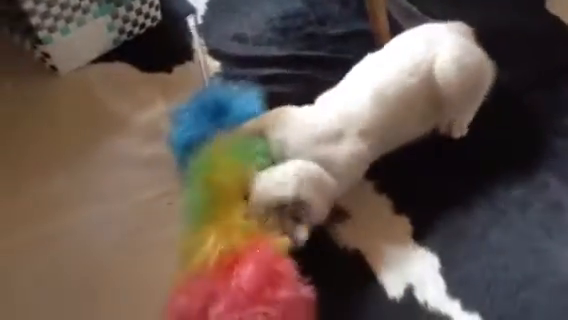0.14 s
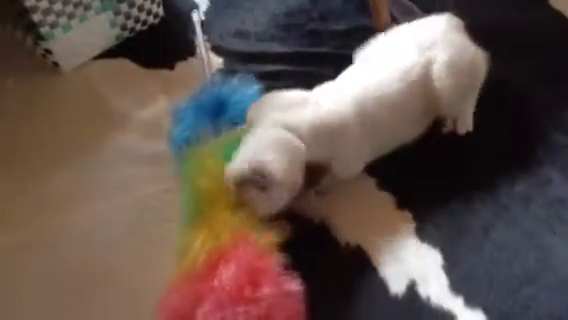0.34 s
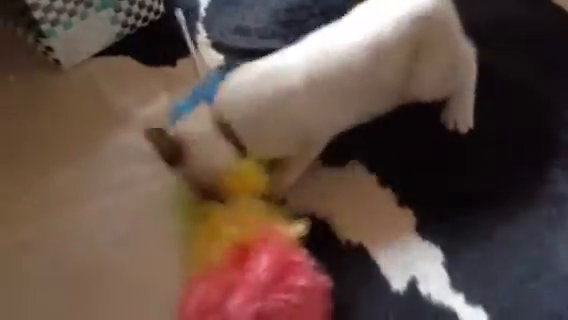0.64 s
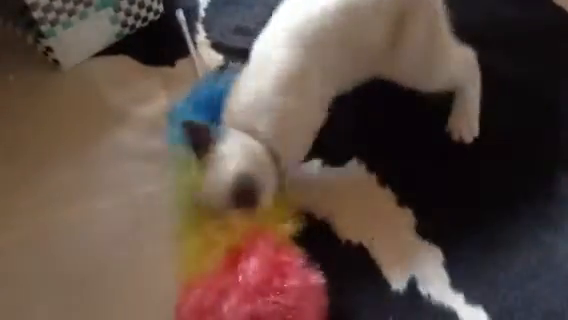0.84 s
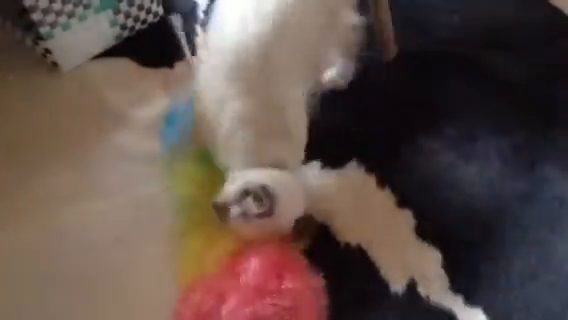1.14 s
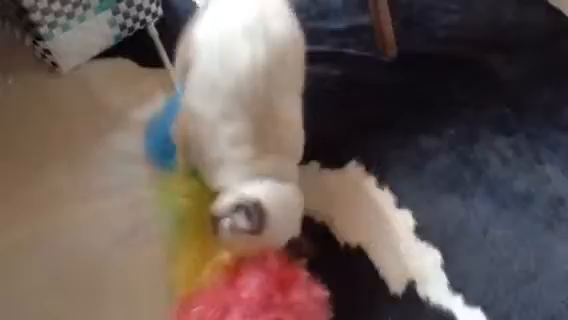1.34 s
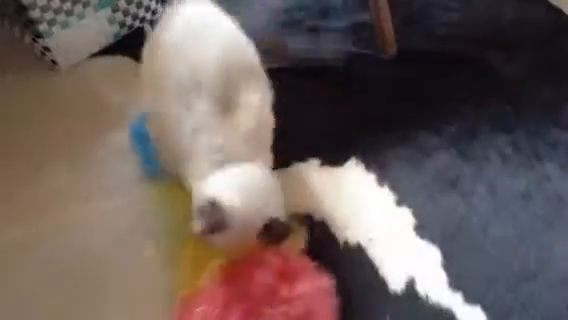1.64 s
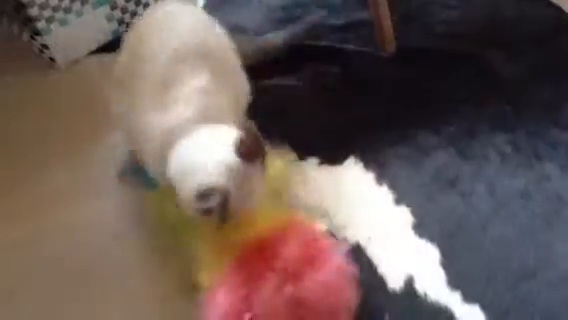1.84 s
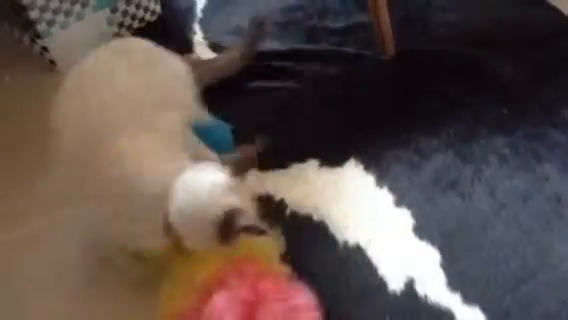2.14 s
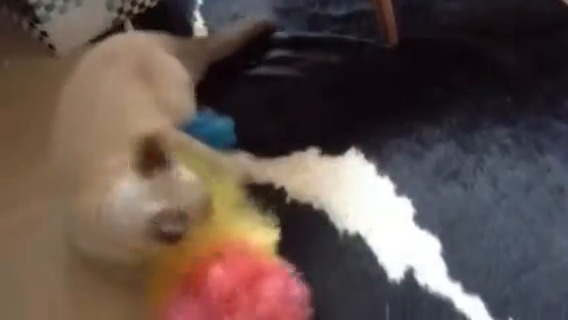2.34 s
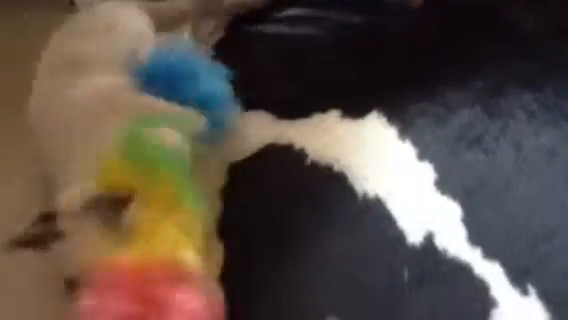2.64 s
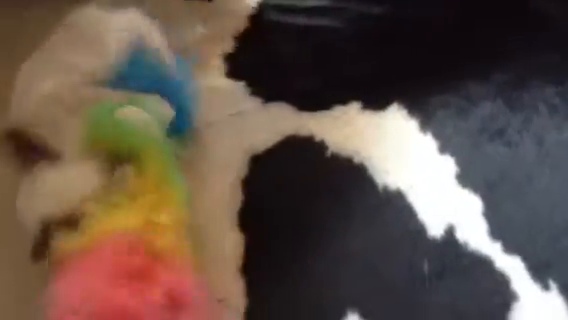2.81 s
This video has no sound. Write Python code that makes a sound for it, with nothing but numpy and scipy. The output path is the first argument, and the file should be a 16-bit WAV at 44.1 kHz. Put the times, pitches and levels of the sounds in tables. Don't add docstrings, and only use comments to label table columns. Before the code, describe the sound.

Cat wrestling a fluffy duster: soft crackly rustling, faint paw thumps, claw squeaks, one hard knock near the end

```python
import sys
import numpy as np
from scipy import signal
from scipy.fft import rfft, irfft
from scipy.io import wavfile
from scipy.ndimage import uniform_filter1d

SR = 44100
rng = np.random.default_rng(int(sys.argv[2]) if len(sys.argv) > 2 else 0)


def transcribe(u):
    v = np.clip(np.atleast_2d(u).T, -1, 1)
    q = np.round(v * 32767).astype(np.int16)
    wavfile.write(sys.argv[1], SR, q)


def magnitude_from_level(level_db):
    exponent = np.asarray(level_db, float) / 20
    return 10 ** exponent


N = 130977


def evened(x):
    return x / np.sqrt(np.mean(x ** 2) + 1e-20)


def read(points, hz):
    f, value = np.transpose(points)
    return np.interp(np.log(hz + 1), np.log(f + 1), value)


def over_time(points):
    return np.interp(np.arange(N) / SR, *np.transpose(points))


def played(events, sound):
    track = np.zeros(N)
    for start, *row in events:
        event = sound(*row)
        part = track[round(start * SR):][:len(event)]
        part += event[:len(part)]
    return track


def resonate(x, hz, width_hz):
    turn = np.exp(2j * np.pi * hz * np.arange(len(x)) / SR)
    r = np.exp(-np.pi * width_hz / SR)
    return 2 * (turn * signal.lfilter([1 - r], [1, -r], x / turn + 1e-18)).real


def resonate_twice(x, hz, width_hz):
    return evened(resonate(resonate(x, hz, width_hz), hz, width_hz))


def coloured(x, points, patchy_db):
    hz, t, z = signal.stft(x, SR, nperseg=512, noverlap=384)
    patches = uniform_filter1d(rng.standard_normal(z.T.shape), size=16, axis=0)
    patches = evened(uniform_filter1d(patches, size=12, axis=1))
    z = z * magnitude_from_level(read(points, hz)[:, None] + patchy_db * patches.T)
    return evened(signal.istft(z, SR, nperseg=512, noverlap=384)[1][:N])


# frequency in Hz, level in dB per Hz.
AIR = [(40, -13.5), (100, -9), (190, -0.5), (600, -5), (950, -11.5), (2000, -13), (6000, -15.5),
       (15000, -18)]


def hiss():
    return magnitude_from_level(-66) * coloured(rng.standard_normal(N), AIR, patchy_db=0.87)


# multiple of the turning rate, level in dB.
HUM = [(2, -85.5), (3, -90), (5.3, -84), (8, -86.5), (10, -85), (17, -85.5)]
# time in seconds, level in dB.
DRONE = [(0, -69), (.5, -72.5), (.64, -81), (1.2, -74), (1.7, -74.5), (2.2, -78), (2.97, -78.5)]


def motor():
    turning_hz, width_hz = 37.1, 2.0
    t = np.arange(N) / SR
    sixth = np.sqrt(2) * np.sin(2 * np.pi * 6 * turning_hz * t)
    upper = np.sin(2 * np.pi * 16 * turning_hz * t)
    upper_swell = np.clip((t - .1) / .2, 0, 1) * (t < .55)
    blur = evened(resonate(rng.standard_normal(N), 222, 12.))
    drone = (sixth + 0.4 * upper * upper_swell + 0.22 * blur) * magnitude_from_level(over_time(DRONE))
    partials = np.zeros(N)
    for multiple, db in HUM:
        partials += magnitude_from_level(db) * resonate_twice(rng.standard_normal(N), multiple * turning_hz, width_hz)
    return drone + partials


# start in seconds, level in dB, centre in Hz, width in Hz.
SPLITS = [(1.367, -72, 7570, 1400), (1.436, -72, 5150, 1050), (1.575, -76, 5150, 1050),
          (1.575, -80, 11700, 1400), (2.226, -76, 6890, 1400), (2.365, -75, 13100, 1400)]


def split(db, hz, width_hz):
    length_s = .046
    t = np.arange(0, length_s, 1 / SR)
    in_band = abs(np.fft.rfftfreq(len(t), 1 / SR) - hz) < width_hz / 2
    band = irfft(rfft(rng.standard_normal(len(t))) * in_band, len(t))
    return magnitude_from_level(db - 2.5) * np.sin(np.pi * t / length_s) * evened(band)


# time in seconds, level in dB.
RUB = [(0, -63.5), (.12, -62.5), (.25, -69), (.4, -64.5), (.6, -63.5), (.82, -63), (1.02, -69.5),
       (1.3, -57.5), (1.44, -60), (1.62, -65), (1.9, -62), (2.06, -62.5), (2.15, -70), (2.37, -59.5),
       (2.48, -61.5), (2.57, -59), (2.68, -62), (2.97, -64)]
# frequency in Hz, level in dB per Hz.
FIBRES = [(150, -18.5), (500, -5), (1000, -7), (2000, -1.5), (4000, -1), (6500, -2.5), (10000, -5),
          (15000, -6)]


def rustle():
    crackles_per_s, spread_db, smooth_share = 2500, 2.5, 0.57
    size = magnitude_from_level(spread_db * np.minimum(rng.exponential(1, N), 4)) * rng.choice([-1, 1], N)
    crackles = evened(size * (rng.random(N) < crackles_per_s / SR))
    mix = smooth_share * rng.standard_normal(N) + (1 - smooth_share) * crackles
    return magnitude_from_level(over_time(RUB) - 1.5) * coloured(mix, FIBRES, patchy_db=1.0)


def stroke(length, db, hz, q):
    t = np.arange(0, .35, 1 / SR)
    slips = rng.standard_normal(len(t)) * (1 + (rng.random(len(t)) < 900 / SR) * 2.5)
    swell = abs(np.sin(np.pi * np.minimum(t / length, 1))) ** 0.43
    return magnitude_from_level(db) * swell * resonate_twice(slips, hz, hz / q)


# start in seconds, length in seconds, level in dB, centre in Hz.
SWISHES = [(.0, .03, -72, 14000), (.32, .085, -72, 13500), (.52, .13, -71, 13500),
           (.654, .035, -65.5, 14000), (.66, .026, -63, 4900), (.66, .028, -66.5, 2900),
           (.77, .06, -72, 13500), (1.11, .1, -74, 13500), (1.1, .12, -75, 5400), (1.24, .1, -68, 5400),
           (1.38, .06, -68, 5500), (1.39, .09, -69, 14000), (1.5, .06, -72, 13000), (2.02, .07, -70, 13500),
           (2.31, .09, -72, 13000), (2.52, .08, -72, 12800), (2.53, .06, -69, 5500),
           (2.715, .075, -68, 12800), (2.8, .04, -63.5, 12800), (2.8, .038, -61.5, 4700)]


def swish(length, db, hz):
    return stroke(length, db, hz, q=3.)


# start in seconds, length in seconds, level in dB, centre in Hz.
SCUFFS = [(0.539, .09, -69, 5530), (.765, 0.077, -63.5, 540), (0.777, 0.2, -68.5, 3400),
          (.800, 0.28, -71, 1574), (1.271, 0.066, -70, 1650), (1.280, 0.1, -72, 3500),
          (1.630, .14, -72, 480), (1.735, .13, -68.5, 5600), (1.820, .16, -74.5, 580),
          (2.043, .045, -67.5, 3300), (2.69, .1, -69, 2600), (2.520, 0.19, -67, 2400),
          (2.530, 0.11, -67, 520), (2.535, .15, -66.5, 4000), (2.710, 0.083, -66, 4970)]


def scuff(length, db, hz):
    return stroke(length, db, hz, q=1.47)


# start in seconds, length in seconds, level in dB, pitch in Hz, glide in Hz.
SQUEAKS = [(1.738, 0.013, -57.5, 5250, 197), (1.743, 0.013, -58.5, 5800, 102.5),
           (1.752, 0.023, -56, 5750, 302), (1.7876, 0.012, -48, 5510, -150),
           (1.796, 0.014, -48.5, 5750, -38), (1.802, .018, -49, 5280, -250), (1.822, 0.0074, -57, 5700, 94),
           (1.831, .016, -60, 5050, 303), (1.834, 0.021, -58.5, 5900, 146), (1.876, 0.011, -58, 5100, 196),
           (1.88, .012, -66, 5800, 197), (1.902, .012, -63, 5900, 290)]


def squeak(length, db, hz, glide):
    wobble, flutter = 0.022, 0.4
    t = np.arange(0, .04, 1 / SR)
    a, b = (evened(uniform_filter1d(v, size=70)) for v in rng.standard_normal((2, len(t))))
    u = np.minimum(t / length, 1)
    pitch = (hz + glide * (u - .5)) * (1 + wobble * a)
    whistle = np.sqrt(2) * np.sin(2 * np.pi * np.cumsum(pitch) / SR)
    return magnitude_from_level(db - 6.5) * abs(np.sin(np.pi * u)) ** 0.78 * (1 + flutter * b) * whistle


# start in seconds, peak in dB,
# pitch in Hz, ring in cycles.
PINGS = [(.358, -55, 4800, 2.3), (0.385, -50.5, 4640, 3), (0.63, -54, 6030, 8.4), (2.504, -50.5, 5370, 4.9),
         (.65752, -36.5, 5300, 1.8), (2.0397, -49, 3600, 2.2), (2.0412, -47.5, 3500, 1.8),
         (2.7985, -36.5, 4500, 1.5), (2.7992, -44, 6800, 3), (.539, -50, 8200, 2.2),
         (2.85786, -39.5, 3100, 2.5), (.6578, -46, 3400, 1.5), (.6575, -46, 14000, 6)]
# start in seconds, peak in dB, pitch in Hz, ring in cycles.
PAWS = [(.657, -63, 300, 1.3), (1.224, -53, 830, 1.6), (1.284, -48.5, 450, 1.4), (1.301, -51.5, 358, 1.6),
        (1.486, -50, 463, 2), (1.499, -58, 228, 1), (1.515, -60, 477, 3), (1.697, -58, 298, 1.1),
        (2.0168, -49, 420, .6), (2.02, -46, 215, .75), (2.0395, -53, 670, 1.1), (2.575, -55, 510, 2),
        (2.609, -55, 556, 1.3), (2.68, -58, 290, 1.7)]


def blip(db, hz, cycles):
    u = np.arange(3000) / SR * hz
    shape = -np.sin(2 * np.pi * u) * (1 - np.exp(-u / 0.13)) * np.exp(-u / max(cycles, .2))
    return magnitude_from_level(db) * shape / abs(shape).max()


# start in seconds,
# peak in dB, pitch in Hz, shiver in seconds.
SNAPS = [(.540, -50.5, 3540, 0.0024), (0.6576, -46, 5050, 0.008), (.6382, -52, 13000, .001),
         (.6415, -48, 11000, .002), (.6553, -50, 14000, .001), (.658, -46.5, 2550, .012),
         (1.311, -50, 2000, .004), (1.913, -52, 1410, .004), (2.0505, -52, 3500, 0.003),
         (2.046, -58, 800, 0.033), (1.2239, -53, 1300, .004), (2.858, -39, 12500, .002),
         (2.8655, -45, 12500, .003), (2.8695, -42, 5800, .008), (2.883, -47, 2500, .004),
         (2.200, -49.5, 4500, 0.0087), (2.374, -46, 6000, 0.005), (2.583, -54, 5300, 0.0022),
         (2.7977, -37.5, 4300, 0.002), (2.7995, -46, 5970, 0.0042), (2.8052, -46, 4800, .003),
         (2.82, -53, 6000, .006), (2.809, -42, 6000, 0.0054), (2.926, -49, 3100, 0.0018),
         (2.943, -52, 6000, 0.0018)]


def snap(db, hz, shiver):
    t = np.arange(3000) / SR
    after = evened(resonate(rng.standard_normal(len(t)), hz, 0.72 * hz))
    after = after * np.exp(-t / shiver) * np.minimum(t / 0.00033, 1)
    return blip(db, hz, cycles=1) + magnitude_from_level(db - 6.5) * after / 2


# frequency in Hz, level in dB, time to fall 60 dB in seconds.
HANDLE = [(149, -8, 0.06), (214, 0.5, .07), (366, -4, .12), (635, -1, 0.1), (800, -15, 0.06),
          (1330, -9, 0.12), (1744, -11, .1), (1949, -10, 0.12), (2062, -3, 0.1), (2729, -5, 0.14),
          (3106, -3, .14), (4161, -14, .1), (4737, -8, .09)]


def knock():
    t = np.arange(0, .15, 1 / SR)

    def bump(at, width):
        return np.exp(-.5 * ((t - at) / width) ** 2)

    blow = -0.8 * bump(0.00028, .0001) + 0.62 * bump(0.00128, 0.00034) - 0.33 * bump(0.00185, 0.00014)
    ring = np.zeros(len(t))
    for hz, db, t60 in HANDLE:
        chatter = evened(resonate(rng.standard_normal(len(t)), hz, .08 * hz))
        ring += magnitude_from_level(db - 60 * t / t60) * (np.sin(2 * np.pi * hz * t) + .55 * chatter)
    rattle = magnitude_from_level(-46 - 60 * t / 0.1) * rng.standard_normal(len(t))
    rattle = rattle * np.minimum(t / 0.007, 1) ** 2
    return magnitude_from_level(-28.5) * blow + magnitude_from_level(-49.5) * np.minimum(t / 0.008, 1) * ring + rattle


# frequency in Hz, time to fall 60 dB in seconds.
ROOM = [(150, 0.21), (500, 0.2), (2000, 0.27), (5000, 0.29), (12000, 0.15)]


def room(x):
    gap_s = 0.0061
    taps = np.zeros(SR // 2)
    at = np.arange(0, len(taps) - 20, 20)
    taps[at + rng.integers(0, 20, len(at))] = rng.choice([-1., 1.], len(at))
    hz, t, z = signal.stft(taps, SR, nperseg=256)
    tail = signal.istft(z * magnitude_from_level(-60 * t / read(ROOM, hz)[:, None]), SR, nperseg=256)[1]
    tail = tail * np.clip(np.arange(len(tail)) / SR / gap_s, 0, 1) ** 3
    return signal.fftconvolve(x, tail / np.linalg.norm(tail))[:N]


def scene():
    hits = played(SNAPS, snap) + played([(2.8577,)], knock)
    rubs = played(PAWS, blip) + played(PINGS, blip)
    rubs += played(SCUFFS, scuff) + played(SWISHES, swish) + played(SQUEAKS, squeak)
    echo = magnitude_from_level(-4.5) * room(hits + 0.38 * rubs)
    mono = hits + echo + rubs + rustle() + hiss() + motor()
    side = played(SPLITS, split)
    return np.array([mono + side, mono - side])


# frequency in Hz, gain in dB.
MIC = [(3000, 0.5), (4400, 2.5), (5450, 6.5), (6600, 3.5), (8500, 0.5), (10500, 0), (13000, 3),
       (15200, 4.5)]


def microphone(x):
    size = 4096
    log_gain = np.log(magnitude_from_level(read(MIC, abs(np.fft.fftfreq(size, 1 / SR)))))
    taps = np.fft.ifft(np.exp(np.conj(signal.hilbert(log_gain)))).real[:size // 2]
    return signal.oaconvolve(x, taps[None], axes=1)[:, :N]


def low_pass(x):
    return signal.sosfilt(signal.butter(12, 16090, fs=SR, output="sos"), x)


def record(dry):
    x = microphone(dry)
    x = signal.sosfilt(signal.butter(2, 126, "high", fs=SR, output="sos"), x)
    edge = signal.firwin(1023, 15370, window=("kaiser", 9), fs=SR)
    x = signal.oaconvolve(x, edge[None], "same")
    return low_pass(x)


dry = scene()
out = record(dry)
transcribe(out)
```